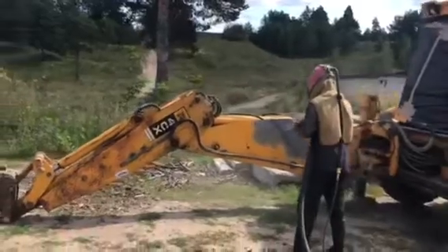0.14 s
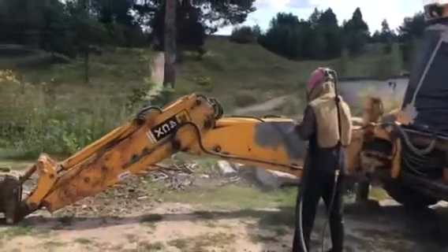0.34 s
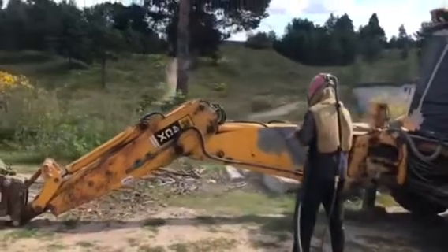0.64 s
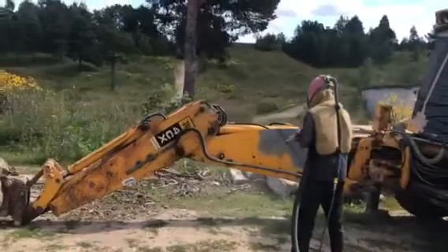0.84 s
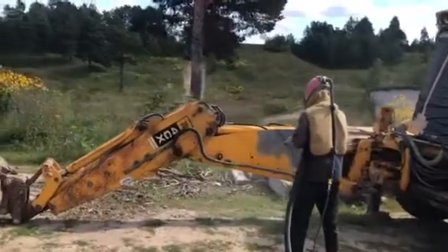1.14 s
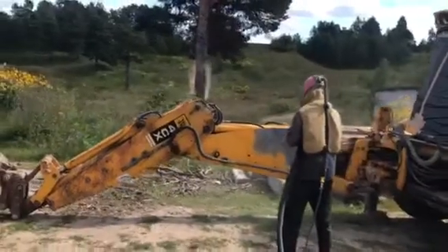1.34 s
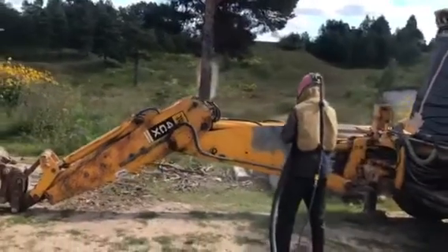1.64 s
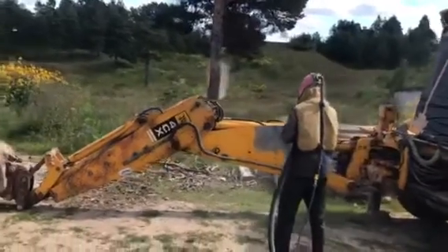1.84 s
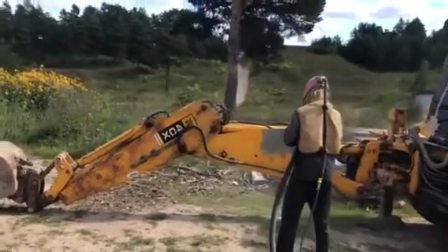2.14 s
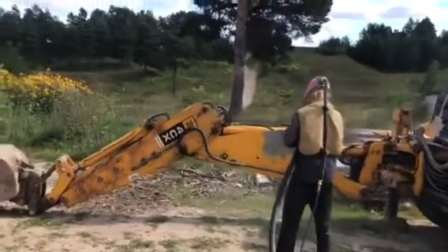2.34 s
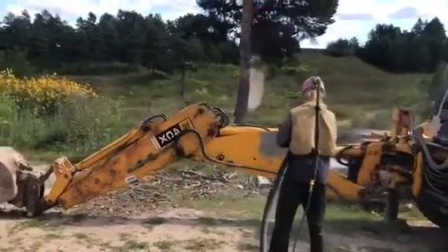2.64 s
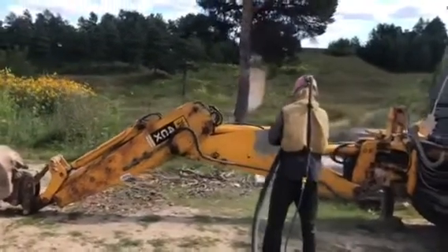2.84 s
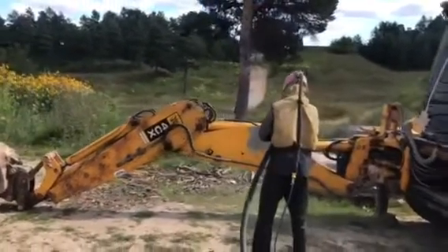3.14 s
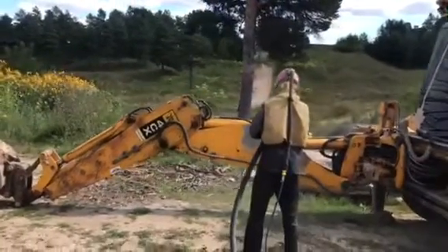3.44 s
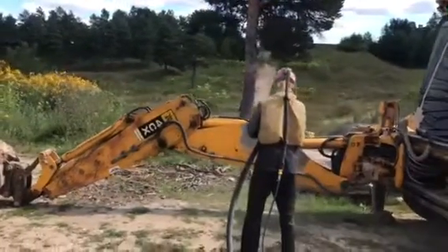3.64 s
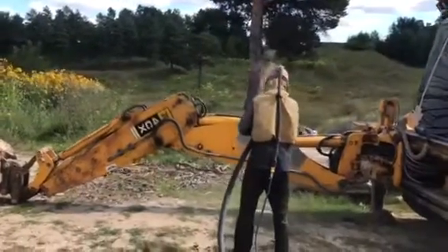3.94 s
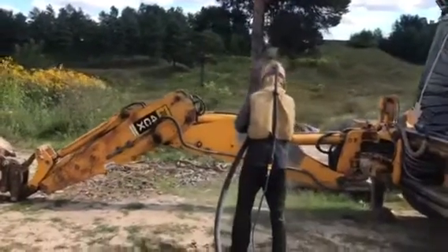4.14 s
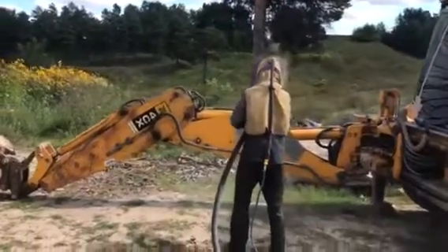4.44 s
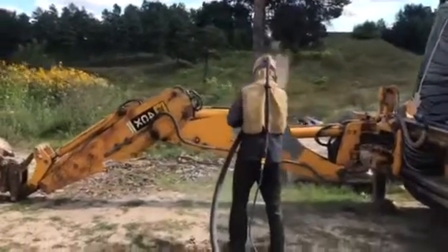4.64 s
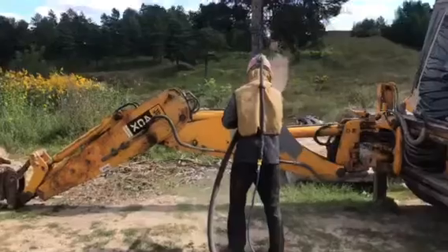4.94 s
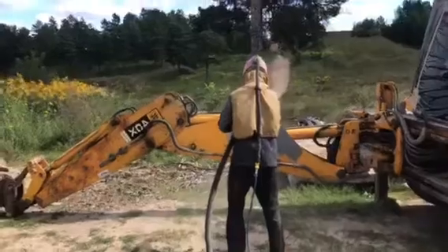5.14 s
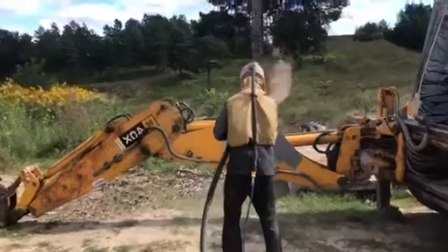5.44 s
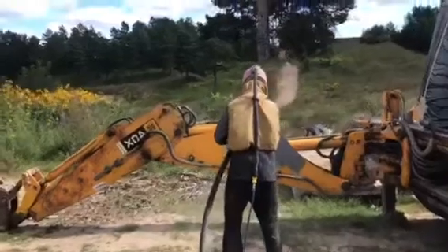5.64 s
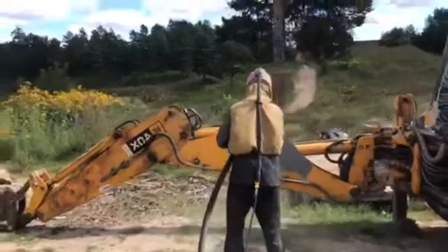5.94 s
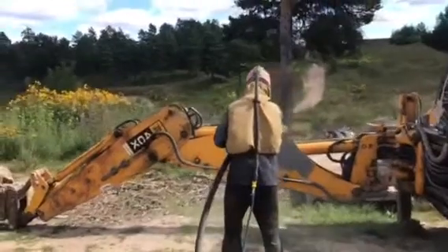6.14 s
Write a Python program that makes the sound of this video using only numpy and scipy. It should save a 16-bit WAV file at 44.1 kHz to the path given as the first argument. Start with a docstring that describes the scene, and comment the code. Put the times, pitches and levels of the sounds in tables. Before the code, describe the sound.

A loud, steady hiss of compressed air and grit blasting a steel machine outdoors, with faint low wind rumble and brief thin whistles near the end.

```python
"""Outdoors, a few metres from an excavator: a nozzle blasts compressed air and grit over its steel boom.
Jet: noise and dense random ticks, fluttering with the grit feed, coloured by aim, gap and steel.
Two near reflections with moving lags comb it; weaker echoes from the machine drift behind.
Over it: short edge whistles (sines), a compressor hum (low sine), wind rumble and puffs (filtered noise)."""
import sys
import numpy as np
from scipy import signal
from scipy.fft import rfft, irfft, next_fast_len
from scipy.io import wavfile
from scipy.ndimage import uniform_filter1d, map_coordinates

SR = 44100
rng = np.random.default_rng(int(sys.argv[2]) if len(sys.argv) > 2 else 0)


def generate_wav(sig):
    """Save sig (samples, or channels by samples) to the path in sys.argv[1] as 16-bit PCM at SR."""
    pcm = np.round(np.clip(np.atleast_2d(sig).T, -1, 1) * 32767).astype(np.int16)
    wavfile.write(sys.argv[1], SR, pcm)


N = 277819
TIME_S = np.arange(N) / SR

# Wind rumble strength. Each row: time in seconds, level in dB before RUMBLE_TRIM_DB.
RUMBLE_LEVEL = [(0, -41), (1.1, -41), (1.35, -44), (2.35, -45.5), (2.8, -42), (3.7, -44), (4.25, -37.5),
                (5.5, -33), (6.3, -35.5)]
# Wind rumble spectrum, relative. Each row: frequency in Hz, density in dB per Hz.
RUMBLE_SPECTRUM = [(20, -40), (35, -15), (48, -3), (62, -3), (88, 2), (135, -5), (175, -2.5), (250, -7),
                   (390, -18.5), (490, -16), (840, -70)]
# Puffs of air on the microphone. Each row: centre in seconds, level in dB, length in seconds.
PUFFS = [(0.047, -42, 0.044), (0.45, -43, 0.04), (.935, -35.5, 0.04), (1.15, -42.5, 0.091),
         (1.458, -40, 0.029), (1.836, -42.5, 0.028), (2.552, -42.5, .05), (2.747, -37, 0.028),
         (3.053, -44, .03), (4.266, -38, .035)]
# Compressor hum. Each row: time in seconds, mean level in dB.
HUM_LEVEL = [(0, -44), (2, -49.5), (3.5, -48.5), (5, -47.5), (6.3, -44.5)]
# Edge whistles. Each row: centre in seconds, frequency in Hz, length in seconds, peak rms level in dB.
WHISTLES = [(5.41, 6360, .04, -27), (5.665, 6750, .03, -19), (5.745, 6050, .03, -24),
            (5.987, 6400, 0.018, -17), (6.116, 6060, .02, -18), (6.136, 6200, .02, -24),
            (6.23, 5680, .04, -20)]
# Slow jet strength. Each row: time in seconds, hiss level in dB before JET_TRIM_DB,
# treble against hiss in dB (only its swing about the mean counts).
BLAST = [(0, -16.5, 4.5), (.3, -16.5, 4), (.85, -16, -1), (1.35, -16.5, 1), (3.05, -18, 0.3),
         (3.65, -20, 2), (4.45, -17, -0.8), (5.1, -16.5, -0.4), (6.05, -16, -0.8), (6.3, -18.5, -1)]
# Momentary surges (+) and lapses (-) of the grit feed. Each row: centre in seconds, length in seconds,
# hiss change in dB, treble change against the hiss in dB.
SURGES = [(1.304, 0.031, -1.5, -0.5), (1.343, .05, 0, 4), (1.63, 0.042, 1.6, -1), (1.708, 0.056, -2, -1),
          (1.753, 0.036, 1.5, -1), (2.06, 0.066, 2.5, 1), (2.323, 0.036, -1.5, -2.5), (2.737, 0.069, -2, 1),
          (3.225, 0.054, 0.3, 1.5), (3.43, 0.054, 0, -4), (3.69, 0.053, -1, -3), (4.116, 0.074, 0.5, 3.5),
          (4.93, 0.048, 1.4, 0), (5.26, 0.12, -2, 1.6), (5.43, 0.17, 1.6, -1), (6.028, 0.13, 1.5, 0)]
# Colour of the aim; only swings about the means count. Each row: time in seconds,
# roar in dB, rush in dB, sizzle in dB, each against the hiss.
AIM = [(0, -16.5, -0.5, -4), (.9, -18, -6, 0), (1.8, -21, -7.5, -5.5), (3.15, -18.5, -8, 0),
       (3.7, -13, -6, -2.5), (4.25, -15.5, -9.5, -2), (4.85, -11.5, -7.5, -5.5), (5.15, -11.5, -5, -3),
       (5.5, -16, -4, -5), (6.3, -15, -6, 1)]
# Free jet spectrum, relative. Each row: frequency in Hz, density in dB per Hz.
JET_SPECTRUM = [(150, -38), (400, -23.5), (490, -23), (620, -7.5), (1100, -9), (1750, -8), (2400, -5.5),
                (3100, -3.5), (4200, 0.1), (5500, -1), (7500, -3), (9500, -4), (12000, -6.5), (15500, -9)]
# Resonances of the steel boom. Each row: centre in Hz, width in Hz, gain in dB.
STEEL = [(665, 79, -1.5), (1466, 280, 3.5), (1700, 290, 2), (2860, 160, -1.5), (4190, 90, 0.5),
         (4500, 110, 2), (5700, 70, 0.5), (5800, 140, -0.5), (8450, 400, 2)]
# Broad resonance of the nozzle-to-steel gap. Each row: time in seconds, centre in Hz, gain in dB.
GAP = [(0, 3940, 2.5), (.6, 4180, 4), (1.0, 4700, 2), (1.55, 3430, 1), (2.0, 3700, 0.5), (2.1, 7350, 3.5),
       (3.2, 7400, 1), (3.55, 7400, 3), (3.6, 2800, 1.5), (3.8, 2730, 4.5), (4.1, 2690, 1.5),
       (4.2, 5940, -2), (5.05, 6000, 3.5), (5.6, 6700, 4), (6.3, 6050, 0)]
# Three hollows moving with the angle to the steel, low to high, one list each.
# Each row: time in seconds, centre in Hz, gain in dB.
HOLLOWS = [
    [(0, 2170, -15), (.6, 2280, -5), (1.1, 2210, -2), (1.5, 2200, -8), (2.0, 2210, -7.5), (2.5, 2090, -3),
     (3.2, 2080, -9), (3.6, 2100, -3), (4.5, 2200, -0.5), (5.1, 1940, 6), (5.28, 1430, -17),
     (5.8, 1395, -13), (6.3, 1370, -3)],
    [(0, 2930, -4), (1.1, 2970, -6), (1.4, 2700, -3), (2.1, 2710, -12), (2.4, 2600, -1), (2.7, 3900, -6),
     (3.3, 3630, -3.5), (3.85, 3670, -6), (4.2, 3200, -3), (4.7, 3250, -9), (5.05, 3240, -14),
     (5.25, 3270, -2), (6.3, 3060, 2.5)],
    [(0, 6600, -3.5), (.4, 7350, -2), (.6, 6850, -5), (.95, 6900, -8), (1.3, 6350, -2), (1.8, 5870, -3),
     (2.3, 5700, 0.5), (4.2, 7800, -0.5), (4.9, 7800, -3), (6.3, 7800, -1.5)],
]
# Fourth hollow, high in the treble. Each row: time in seconds, centre in Hz, gain in dB.
TOP_HOLLOW = [(0, 11600, -4), (.9, 11300, -4.5), (1.3, 11000, -1), (6.3, 11000, 2)]
# Near reflections. Each row: time in seconds, first lag in ms, second lag in ms.
REFLECTION_LAGS = [(0, 1.72, 1.97), (.5, 1.71, 2.0), (1.1, 1.7, 1.98), (1.6, 1.68, 2.03), (2.1, 1.7, 2.01),
                   (2.5, 1.73, 1.96), (3.1, 1.75, 1.96), (3.65, 1.72, 1.87), (4.2, 1.74, 1.84),
                   (4.8, 1.77, 1.89), (5.35, 1.78, 1.96), (5.75, 1.79, 2.03), (6.3, 1.79, 2.01)]
# Microphone port ripple. Each row: centre in Hz, width in Hz, gain in dB.
PORT = [(10370, 710, -2.5), (10830, 610, -2.5), (12650, 1300, 2.5), (13800, 900, -1.2)]

RUMBLE_TRIM_DB, GUST_SPREAD_DB, GUSTS_PER_S = -3.0, 1.0, 12
HUM_HZ = 52
JET_TRIM_DB = -2
# chance wander of the grit feed, on top of the surges
FEED_TURNS_PER_S, FEED_HISS_DB, FEED_TREBLE_DB = 17, .5, .7
TOP_HZ = 15700


def undb(db):
    """Amplitude ratio of a dB value."""
    return 10 ** (np.asarray(db) / 20)


def unit(x):
    """Scale to rms 1."""
    return x / np.sqrt(np.mean(x ** 2))


def curves(table, at_s=TIME_S):
    """Columns of a table, joined by straight lines in time."""
    s, *columns = np.transpose(table)
    return [np.interp(at_s, s, column) for column in columns]


def spectrum_db(points, hz):
    """(Hz, dB) points joined on a log-frequency axis."""
    point_hz, point_db = np.transpose(points)
    return np.interp(np.log(hz + 1), np.log(point_hz), point_db)  # + 1 avoids log(0)


def bell(x, centre, width):
    """Smooth bump of height 1, `width` wide at half height."""
    return .5 ** ((2 * (x - centre) / width) ** 2)


def resonances_db(table, hz):
    """Summed gain of fixed bumps."""
    return sum(db * bell(hz, centre_hz, width_hz) for centre_hz, width_hz, db in table)


def sweep_db(table, width_share, hz, s):
    """Gain over frequency and time of one moving bump or hollow; width is a share of its centre."""
    centre_hz, db = curves(table, s)
    return db * bell(hz[:, None], centre_hz, width_share * centre_hz)


def shaped(x, db_of_hz):
    """Filter by a fixed gain in dB against frequency."""
    size = next_fast_len(N)
    spectrum = rfft(x, size)
    hz = np.arange(len(spectrum)) * SR / size
    return irfft(spectrum * undb(db_of_hz(hz)), size)[:N]


def butter(x, order, cut_hz, kind):
    """Butterworth filter."""
    return signal.sosfilt(signal.butter(order, cut_hz, kind, fs=SR, output="sos"), x)


def walk(turns_per_s):
    """Smooth random curve, rms 1."""
    steps = rng.standard_normal(4096)
    return unit(map_coordinates(steps, [TIME_S * turns_per_s], order=3, mode="wrap"))


def delayed(x, lag_ms):
    """Read the sound at a moving lag."""
    return map_coordinates(x, [np.arange(N) - lag_ms * SR / 1000], order=3)


def wind_rumble():
    """Moving air: low noise with gusty level."""
    rumble = unit(shaped(rng.standard_normal(N), lambda hz: spectrum_db(RUMBLE_SPECTRUM, hz)))
    gusts_db = GUST_SPREAD_DB * walk(GUSTS_PER_S)
    return rumble * undb(curves(RUMBLE_LEVEL)[0] + RUMBLE_TRIM_DB + gusts_db)


def wind_puffs():
    """Air striking the microphone: short thuds of low noise."""
    thud = butter(rng.standard_normal(N), 2, [50, 219], "band")
    out = np.zeros(N)
    for s, db, length_s in PUFFS:
        puff = thud * bell(TIME_S, s, length_s)
        puff_rms = np.sqrt(np.sum(puff ** 2) / (length_s * SR))
        out += undb(db) * puff / puff_rms
    return out


def compressor():
    """Firing note of the distant compressor engine: a sine, slightly unsteady in pitch and level."""
    hz = HUM_HZ + .15 * walk(2.8)
    tone = unit(np.sin(2 * np.pi * np.cumsum(hz) / SR))
    return undb(curves(HUM_LEVEL)[0] + 2.0 * walk(4)) * tone


def edge_whistles(waver_hz=44.2):
    """The jet catches an edge: short sines with wavering pitch."""
    drift_turns = np.cumsum(waver_hz * walk(150)) / SR
    out = np.zeros(N)
    for s, hz, length_s, db in WHISTLES:
        tone = np.sqrt(2) * np.sin(2 * np.pi * (hz * TIME_S + drift_turns))
        out += undb(db) * bell(TIME_S, s, length_s / 2) * tone  # half height spans half the length
    return out


def surges_db(at_s, column):
    """Change by feed surges of the hiss (column 0) or of the treble (column 1)."""
    return sum(row[column] * bell(at_s, s, length_s) for s, length_s, *row in SURGES)


def grit_stream(grains_per_s=6000, grit_db=-9, grain_spread_db=4, flutter_db=.49, flutter_per_s=45):
    """Turbulent air plus a dense hail of grains, fluttering together with the uneven feed."""
    air = rng.standard_normal(N)
    hits = rng.random(N) < grains_per_s / SR
    sizes_db = grain_spread_db * np.minimum(rng.exponential(size=N), 4.3)
    grains = hits * rng.uniform(-1.0, 1, N) * undb(sizes_db)
    ticks = signal.lfilter([1, -1], [1, -.6], grains)  # tiny hard impacts carry no bass
    return (air + undb(grit_db) * unit(ticks)) * undb(flutter_db * walk(flutter_per_s))


def aim_db(hz, s):
    """Swing of each frequency zone with aim and feed, blended into its neighbours."""
    roar, rush, sizzle = (c - c.mean() for c in curves(AIM, s))
    treble = curves(BLAST, s)[1]
    wander = FEED_TREBLE_DB * np.interp(s, TIME_S, walk(FEED_TURNS_PER_S))
    treble = treble - treble.mean() + surges_db(s, 1) + wander
    steady = 0 * s
    centres_hz = [850, 2100, 3700, 6200, 8000, 12000]
    swings_db = [roar, rush, steady, steady, (sizzle + treble) / 2, treble]
    shares = np.eye(len(centres_hz))
    return sum(np.outer(np.interp(hz, centres_hz, share), swing) for share, swing in zip(shares, swings_db))


def eddies():
    """Shimmer maker: smoothed noise makes neighbouring frequencies swell and fade together."""
    def draw(shape):
        across_hz = uniform_filter1d(rng.standard_normal(shape), size=40, axis=0)
        return unit(uniform_filter1d(across_hz, size=4, axis=1))
    return draw


def aimed(x, shimmer_db=.87, gap_width=.18, hollow_width=.11):
    """Colour the jet by its angle and distance to the steel."""
    hz, s, frames = signal.stft(x, SR, nperseg=1024)
    fixed_db = spectrum_db(JET_SPECTRUM, hz) + resonances_db(STEEL, hz)
    db = aim_db(hz, s) + fixed_db[:, None] + sweep_db(GAP, gap_width, hz, s)
    for hollow in [*HOLLOWS, TOP_HOLLOW]:
        db = db + sweep_db(hollow, hollow_width, hz, s)
    db = db + shimmer_db * eddies()(db.shape)
    return signal.istft(frames * undb(db), SR)[1][:N]


def reflections(x, first=.24, second=.23, scatter=.075, dull_hz=10500, count=12):
    """Two short detours, the second inverted, comb the hiss; weak machine echoes drift with the nozzle."""
    first_ms, second_ms = curves(REFLECTION_LAGS)
    near = first * delayed(x, first_ms) - second * delayed(x, second_ms)
    far = sum(delayed(x, lag_ms + .08 * walk(1.6)) for lag_ms in rng.uniform(2.3, 6.5, count))
    far = butter(far, 1, 2500, "high")  # small steel parts only throw back short waves
    # the plume is too wide for sharp combs in the highest treble
    return x + shaped(near + scatter * far, lambda hz: -10 * np.log10(1 + (hz / dull_hz) ** 6))


def jet():
    """The blast as it arrives: levelled on its main hiss band, then given its strength curve."""
    x = reflections(aimed(grit_stream()))
    hiss = butter(x, 6, [3300, 6800], "band")
    hiss_rms = np.sqrt(uniform_filter1d(hiss ** 2, size=SR // 3))
    feed_db = surges_db(TIME_S, 0) + FEED_HISS_DB * walk(FEED_TURNS_PER_S)
    return x / hiss_rms * undb(curves(BLAST)[0] + feed_db + JET_TRIM_DB)


def scene():
    """All sources reach one microphone, the same in both channels."""
    mono = wind_rumble() + wind_puffs() + compressor() + edge_whistles() + jet()
    return np.array([mono, mono])


def record(dry):
    """The microphone port ripples the treble; the top is cut steeply."""
    heard = [shaped(x, lambda hz: resonances_db(PORT, hz)) for x in dry]
    return signal.sosfilt(signal.ellip(12, .1, 90, TOP_HZ, fs=SR, output="sos"), heard)


dry = scene()
out = record(dry)
generate_wav(out)
```